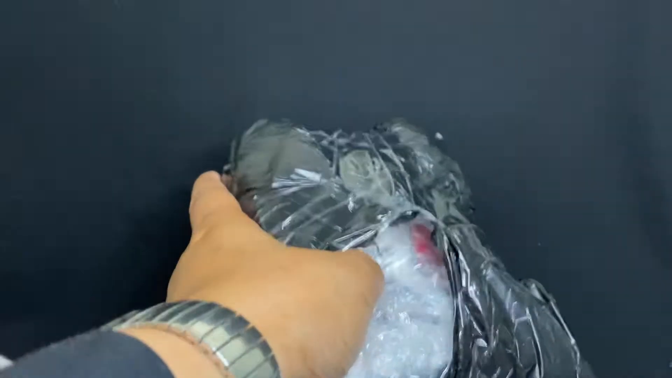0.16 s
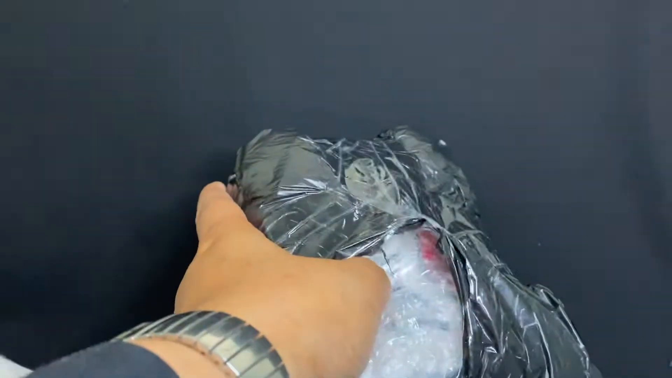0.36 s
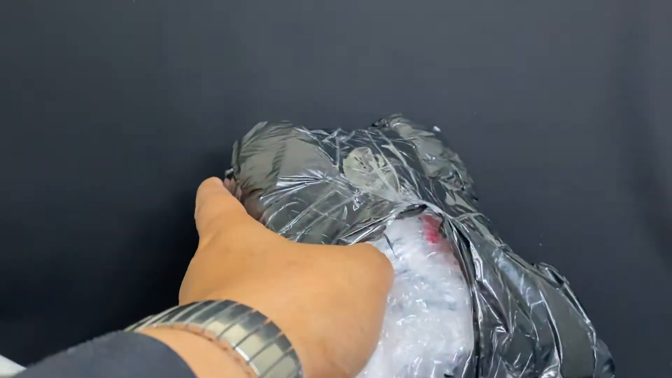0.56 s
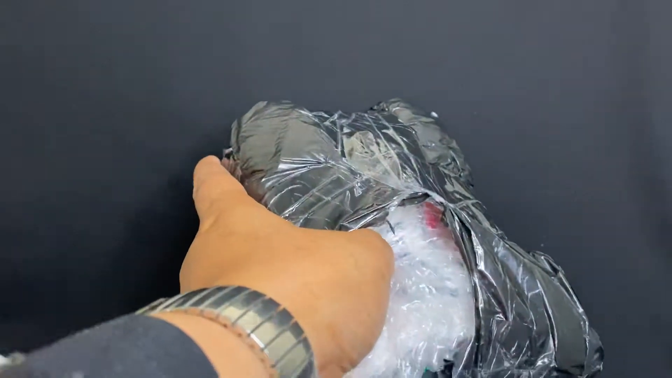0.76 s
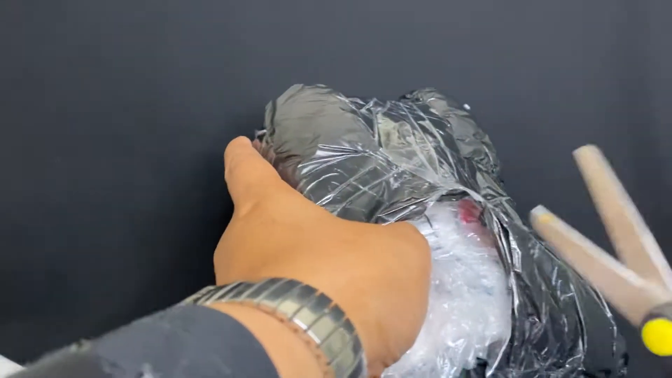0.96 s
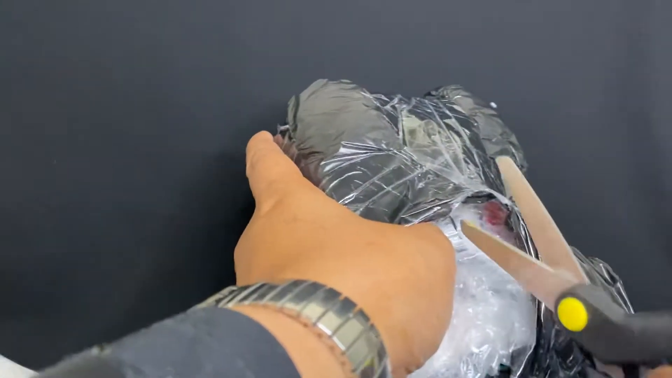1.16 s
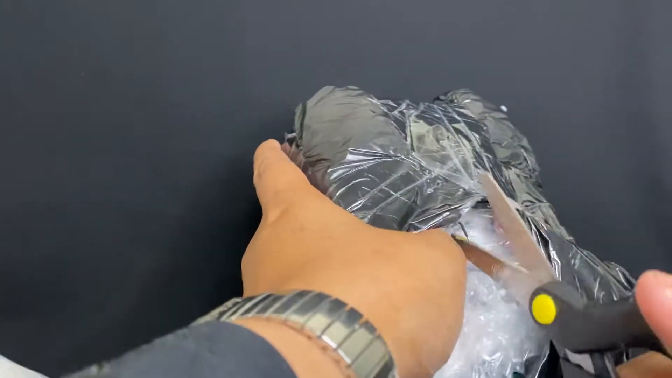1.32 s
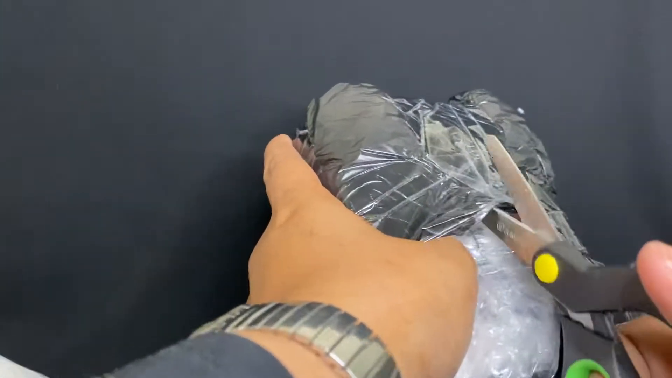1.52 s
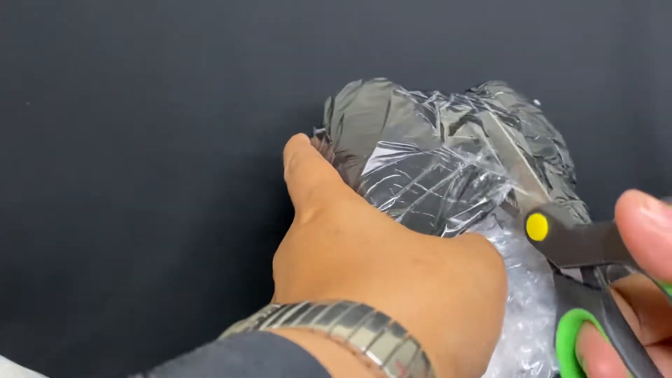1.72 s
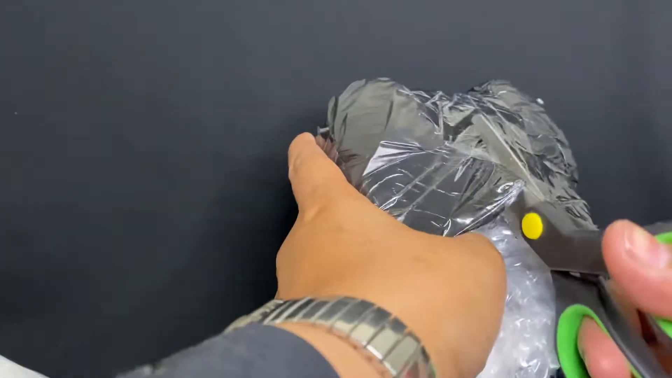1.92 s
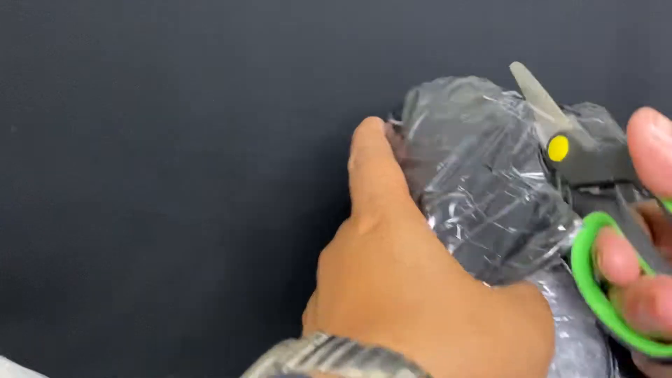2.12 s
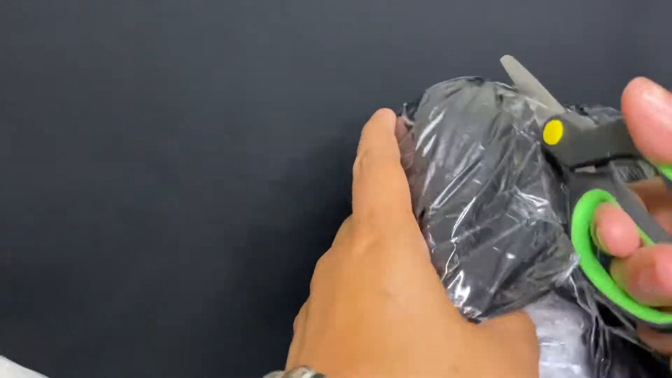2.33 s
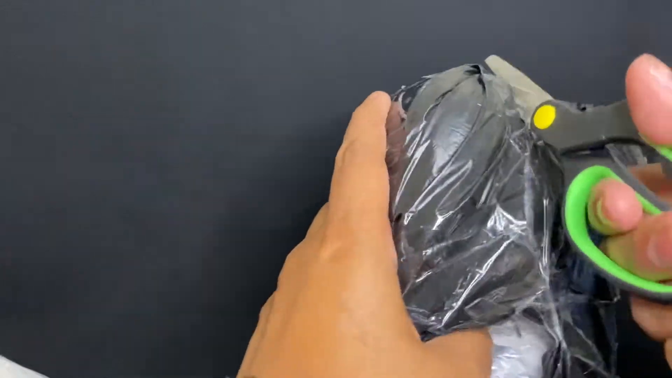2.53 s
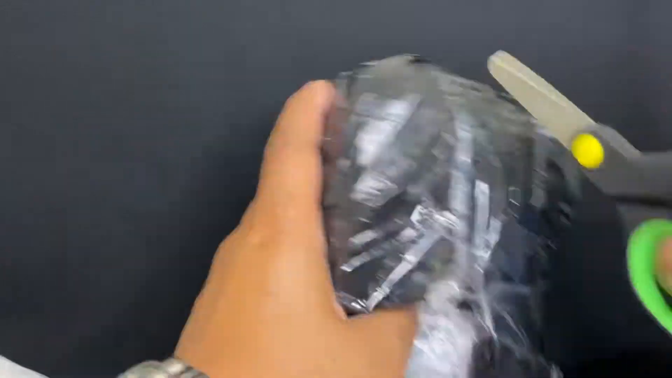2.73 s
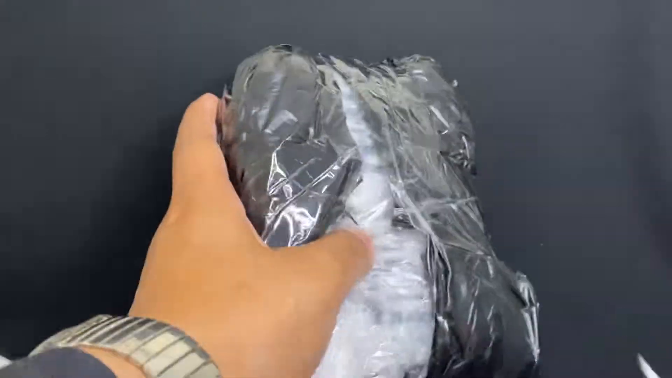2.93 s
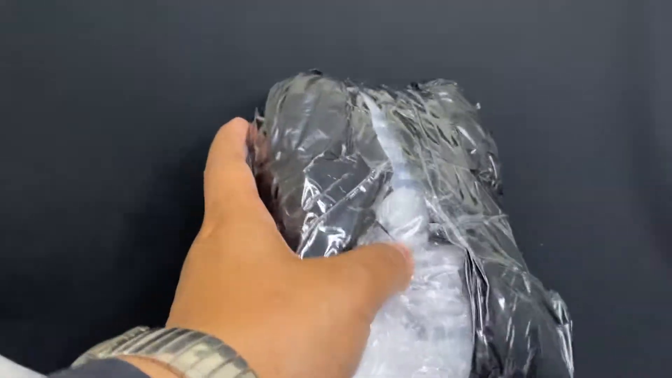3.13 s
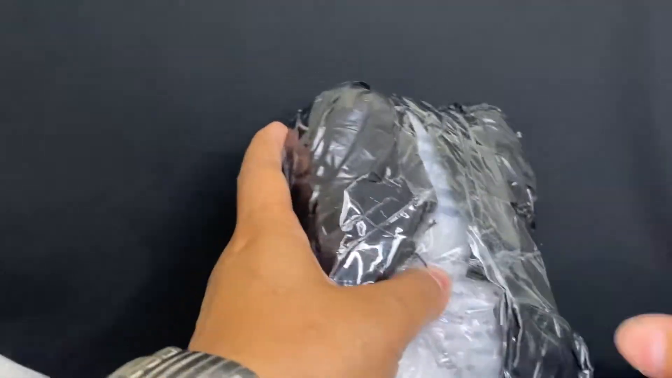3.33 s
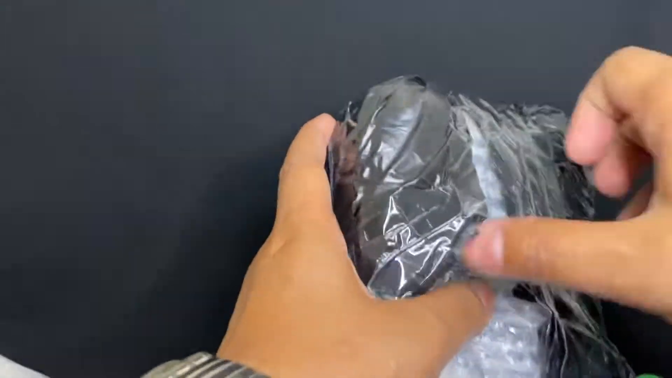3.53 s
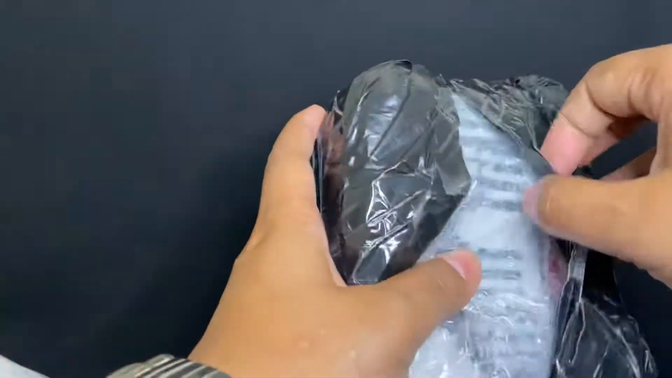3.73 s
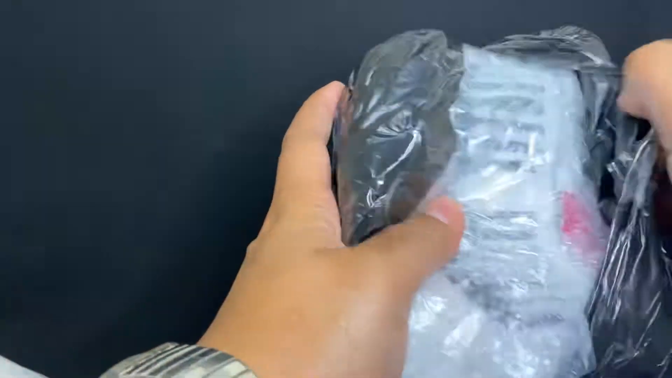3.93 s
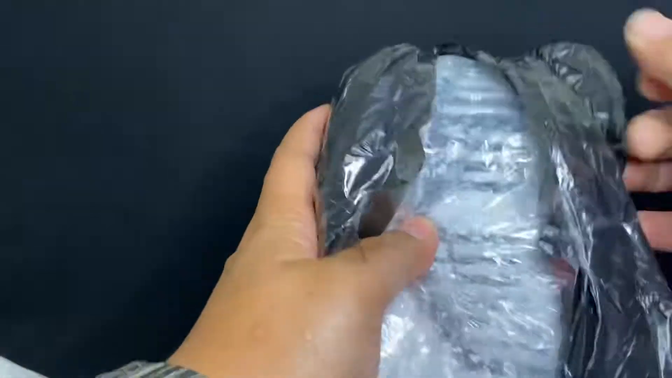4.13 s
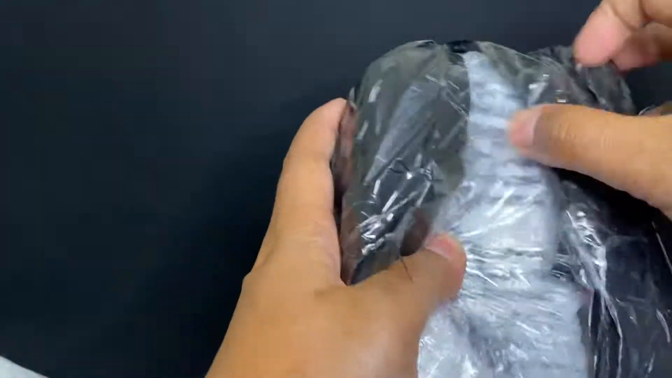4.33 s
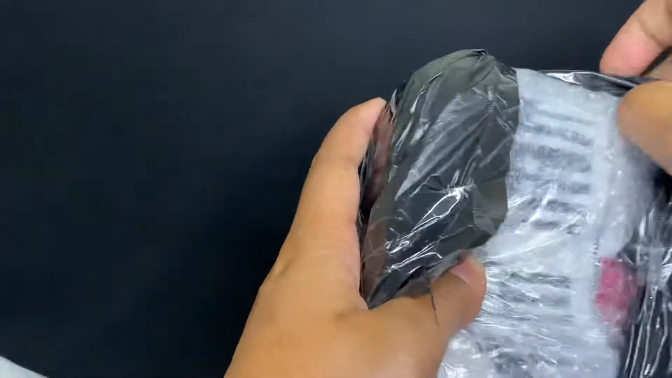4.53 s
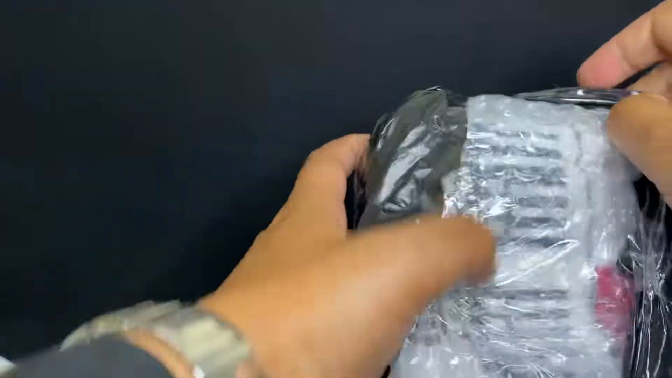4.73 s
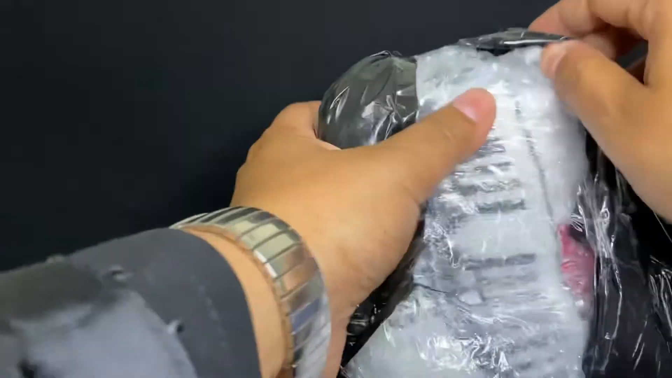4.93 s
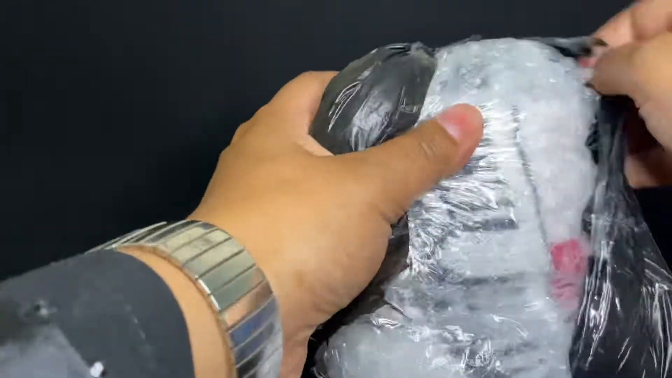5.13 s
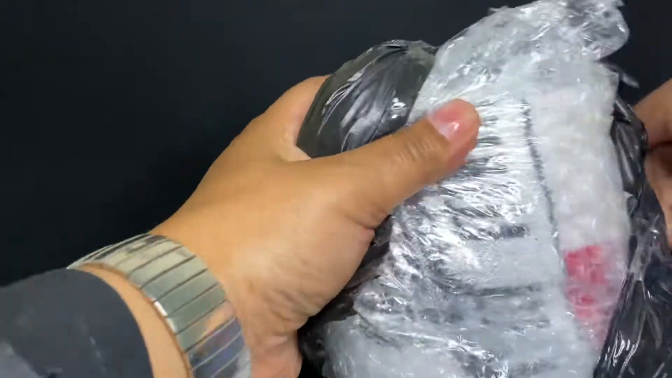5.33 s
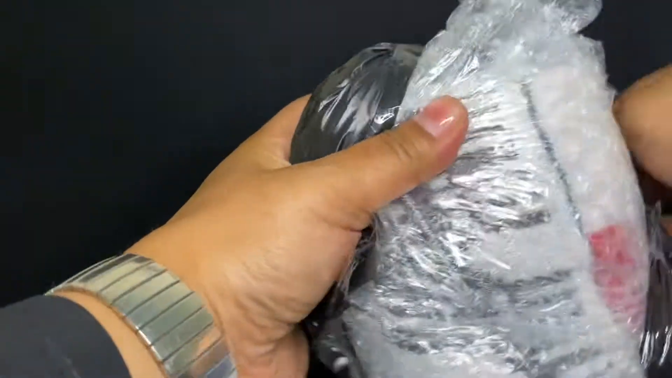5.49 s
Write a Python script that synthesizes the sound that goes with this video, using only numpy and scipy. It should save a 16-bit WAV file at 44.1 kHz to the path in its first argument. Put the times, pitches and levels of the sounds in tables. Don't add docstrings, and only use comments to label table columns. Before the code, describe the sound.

A close, dry stereo phone pickup in a quiet room with a faint low hum. At about 0.1 s a soft, deep table thump marks the grip shifting, with lighter bumps near 0.2 and 0.4 s; until 1.4 s there are only faint film rustles and tiny flicks. From 1.45 s scissors work into the plastic, and from about 1.75 to 2.15 s they bite with dense crunchy rustling, hollow mid-pitched snaps and fine ticks. Smaller snips and creases continue, thinning out by 2.85 s. Around 3.05 s the parcel drops with a low thud, and from 3.44 to 3.6 s the scissors clatter down in a cluster of strong, booming tabletop knocks. From 3.6 s fingers pull the film, swelling to bright crackles and hard snaps around 3.9-4.1 s, a very sharp pop at 4.4 and 4.56 s, another burst near 5.15 s, and continued peeling crackle to the end at about 5.7 s.

```python
import sys
import numpy as np
from scipy import signal
from scipy.fft import rfft, irfft
from scipy.io import wavfile
from scipy.ndimage import uniform_filter1d

SR = 44100
rng = np.random.default_rng(int(sys.argv[2]) if len(sys.argv) > 2 else 0)


def dump(signal):
    limited = np.clip(np.atleast_2d(signal).T, -1, 1)
    pcm = np.round(limited * 32767).astype(np.int16)
    wavfile.write(sys.argv[1], SR, pcm)


def invert_db(level):
    return 10 ** (np.asarray(level, dtype=float) / 20)


N = 249606
SECONDS = np.arange(N) / SR
TRAVEL_S = 0.007
FIRST_S = 0.00139


def evened(x):
    return x / np.sqrt(np.mean(x ** 2) + 1e-20)


def read(points, hz):
    f, value = np.transpose(points)
    return np.interp(np.log(hz + 1), np.log(f + 1), value)


def follow(points):
    return np.interp(SECONDS, *np.transpose(points))


def add(mix, s, sound):
    part = mix[..., round(s * SR):][..., :sound.shape[-1]]
    part += sound[..., :part.shape[-1]]


def coloured(x, points):
    return irfft(rfft(x) * invert_db(read(points, np.fft.rfftfreq(len(x), 1 / SR))), len(x))


def band(x, lo_hz, hi_hz):
    return signal.sosfilt(signal.butter(2, [lo_hz, hi_hz], "band", fs=SR, output="sos"), x)


def noise_band(count, lo_hz, hi_hz):
    return evened(band(rng.standard_normal(count), lo_hz, hi_hz))


# [peak t/s, level/dB, rise t/s, fall t/s]
CUT_GESTURES = [(0.039, -53, 0.08, 0.17), (.184, -56.5, 0.1, 0.42), (0.374, -58.5, 0.23, 0.22),
                (.489, -54.5, 0.07, 0.41), (0.775, -57.5, 0.071, 0.51), (.878, -67, 0.033, 0.25),
                (1.011, -55.5, 0.02, 0.02), (1.195, -60.5, 0.053, 0.15), (1.312, -55, 0.0083, 0.094),
                (1.362, -56, 0.032, 0.032), (1.453, -50, 0.0039, 1), (1.52, -49, 0.04, 0.15),
                (1.595, -39.5, 0.087, 0.092), (1.682, -46, 0.0058, 0.13), (1.797, -33, 0.04, 0.038),
                (2.002, -32, 0.032, 0.12), (2.05, -33, 0.035, 0.095), (2.11, -29.5, 0.11, 0.061),
                (2.241, -40.5, 0.039, 0.14), (2.308, -35, 0.049, 0.06), (2.447, -41.5, 0.17, 0.14),
                (2.574, -43, 0.072, 0.021), (2.699, -36, 0.086, 0.039), (2.824, -48, 0.25, 0.51)]
# [peak t/s, level/dB, rise t/s, fall t/s]
PULL_GESTURES = [(3.077, -61.5, 0.12, 0.62), (3.19, -54.5, 0.07, 0.093), (3.31, -57.5, 0.52, 0.1),
                 (3.445, -52, 0.023, 0.056), (3.566, -36.5, 0.033, 0.99), (3.851, -33, 0.012, 0.062),
                 (3.94, -28.5, 0.16, 0.093), (3.989, -30, 0.073, 0.029), (4.411, -34.5, 0.02, 0.093),
                 (4.624, -28, .01, 0.012), (5.199, -24.5, 0.053, 0.014), (4.037, -23, 0.0062, 0.031),
                 (4.079, -29.5, 0.026, 0.039), (4.16, -38, 0.085, 0.43), (4.362, -31.5, 0.2, 0.32),
                 (4.58, -33.5, 0.54, 0.27), (4.848, -35, 0.041, 1), (5.144, -28.5, 0.39, 0.22),
                 (5.4, -36.5, 0.65, 0.37), (5.504, -31.5, 0.55, 0.016), (5.66, -33, 0.18, .2)]


def effort():
    swing_db, rest_db = 20, -86
    t = np.arange(0, N + 64, 64) / SR
    s, db, rise, fall = np.transpose(CUT_GESTURES + PULL_GESTURES)[..., None]
    before = (s - t) / np.maximum(rise, 0.002)
    after = (t - s) / np.maximum(fall, 0.002)
    away = np.where(t < s, before, after)
    power = invert_db(2 * (db - swing_db * away)).sum(0) + invert_db(2 * rest_db)
    return np.interp(SECONDS, t, 10 * np.log10(power))


def buckles(per_s=2500, spread_db=7.5):
    size = invert_db(spread_db * np.minimum(rng.exponential(1, N), 3.0))
    size *= rng.random(N) < per_s / SR
    size *= rng.choice([-1., 1.], N)
    kind = rng.integers(0, 24, N)
    t = np.arange(200) / SR
    out = np.zeros(N)
    for k, hz in enumerate(np.geomspace(600, 15000, num=24)):
        grain = np.sin(2 * np.pi * hz * t) * np.exp(-t * hz / 1.3)
        out += signal.oaconvolve(size * (kind == k), evened(grain) * np.sqrt(hz))[:N]
    return evened(out)


# [f/Hz, level/dB]
FILM_TONE = [(150, 4.5), (400, 1), (900, 1), (1700, -0.5), (3000, -5), (6000, -8), (10000, -5.5),
             (15500, -9)]
# [t/s, level/dB]
FOLD_SIZE = [(0, -10.5), (.3, -1), (1.0, -13), (1.4, -2), (1.8, -3.5), (2.048, 4.5), (2.6, -2.5),
             (2.78, -10.5), (3.038, -7.5), (3.35, -4), (3.5, 0), (3.6, -6.5), (4.55, -5.5), (4.9, -6),
             (5.15, -8.5), (5.66, -3.5)]
# [t/s, level/dB]
HOLLOW = [(1.4, -34), (1.46, -6), (1.57, 11.5), (1.7, -18), (1.95, -19), (2.0, -26), (2.07, -20),
          (2.12, -11), (2.2, -19), (2.3, -15), (2.75, -12), (3.0, -39)]


def rustle(clump_db=1.89, wash_db=3.0):
    clumps = evened(uniform_filter1d(uniform_filter1d(rng.standard_normal(N), 250), 250))
    level_db = effort()
    blur_db = wash_db + 0.32 * (level_db + 41.5)
    swarm = buckles() + invert_db(blur_db) * rng.standard_normal(N)
    swarm *= invert_db(clump_db * clumps) / np.sqrt(1 + invert_db(2 * blur_db))
    film = coloured(swarm, FILM_TONE)
    film /= np.std(band(film, 2500, 7000))
    low = signal.sosfiltfilt(signal.butter(1, 2000, fs=SR, output="sos"), film)
    body_db = follow(FOLD_SIZE) - 0.1859 * (level_db + 61.5)
    low_gain = invert_db(body_db) / np.std(band(low, 500, 2000))
    hollow = invert_db(follow(HOLLOW)) * band(low, 1250, 1990)
    return invert_db(level_db - 3.5) * (film - low + low_gain * (low + hollow))


def creased(creases, blunt=0):
    out = np.zeros(N)
    t = np.arange(1500) / SR
    ms = 1000 * t
    give = 1 - np.exp(-ms / 0.5)
    for k, (s, db, hz, sharp_db) in enumerate(creases):
        cycles = 1.3 if 1.4 < s < 2.35 else 0.55
        u = t * hz / cycles
        ring = np.sin(2 * np.pi * hz * t) * u * np.exp(1 - u)
        crack = invert_db(sharp_db + 6.0) * noise_band(1500, 1500, 5000) * np.exp(-ms / 0.9)
        dull_db = -10 if k < blunt else 0
        edge = invert_db(1.1 * sharp_db + 6.5 + dull_db) * noise_band(1500, 3500, 16400) * np.exp(-ms / 0.8)
        shiver = invert_db(-20) * noise_band(1500, 0.16 * hz, min(2.2 * hz, 15000)) * np.exp(-ms / 3.6)
        add(out, s, invert_db(db - 13.0) * (ring + (crack + edge + shiver) * give))
    return out


# [t/s, peak level/dB, ring f/Hz, sharpness level/dB]
NICKS = [(.026, -24.5, 1970, -1.5), (.499, -16, 2770, -4), (1.018, -25, 2360, -0.5), (1.45, -30, 1570, -8),
         (1.763, -15, 1730, -5.5), (1.7834, -5.5, 3100, -22), (1.785, -1.5, 1700, -9.5),
         (1.7955, -11.5, 764, -25), (1.797, -7, 1590, -15), (1.974, -21, 1620, -26), (1.993, -4, 1860, -30),
         (2.002, -5.5, 1570, -30), (2.0125, -4, 1760, -28), (2.025, -5, 1650, -26), (2.043, -13.5, 1030, 0),
         (2.074, -13.5, 750, -10), (2.131, -10, 1690, -3.5), (2.291, -13, 1590, -12),
         (2.305, -14, 1590, -23), (2.359, -24, 1840, 2), (2.38, -26.5, 1690, 4.5), (2.419, -10, 1840, -11),
         (2.437, -10.5, 930, 0.5), (2.483, -18, 700, -3.5), (2.565, -6.5, 1820, -6.5),
         (2.597, -15.5, 1960, -0.5), (2.659, -19.5, 2630, -0.5), (2.683, -19, 1250, -21),
         (2.694, -18.5, 810, -18), (2.833, -15.5, 1470, 0), (2.847, -17.5, 1370, -5),
         (2.979, -18.5, 1250, -3)]
# [t/s, peak level/dB, ring f/Hz, sharpness level/dB]
TUGS = [(3.035, -20, 1100, -30), (3.434, -29, 920, -26), (3.282, -22.5, 1010, -3.5),
        (3.313, -18, 6900, -17), (3.415, -30, 5300, -7), (3.4755, -8, 4440, -22), (3.667, -16, 1650, -2),
        (3.705, -10, 3150, -8), (3.734, -9, 3120, -11), (3.769, -14.5, 1350, -6), (3.818, -14, 1380, -3),
        (3.845, -19, 800, 7), (3.9, -8.5, 1190, -10), (3.926, -2.5, 940, -4.5), (3.986, -5.5, 4700, -6),
        (4.006, -5, 1280, -10), (4.033, -8.5, 726, -7), (4.081, -2.5, 3080, -24), (4.151, -20, 1660, -8),
        (4.24, -10.5, 1220, -2), (4.336, -5.5, 2450, -1.5), (4.367, -4.5, 1640, 0), (4.407, 4.5, 6470, -20),
        (4.408, -7, 1310, -15)]
# [t/s, peak level/dB, ring f/Hz, sharpness level/dB]
PEELS = [(4.496, -18, 4100, -12), (4.558, 6, 1330, -11.5), (4.621, -13, 750, -9), (4.772, -18.5, 1130, -34),
         (4.844, -9, 1210, -21), (4.988, -11.5, 7300, 0), (5.0985, -3, 1090, -2.5), (5.107, -1, 2320, -5),
         (5.149, -1.5, 930, 1.5), (5.154, -2, 1660, 1.5), (5.182, 2, 4800, -8), (5.186, -6, 1540, -10),
         (5.449, -12.5, 1000, -20), (5.493, -12.5, 968, -5), (5.519, -10.5, 1100, -7),
         (5.599, -13.5, 1040, 1.5), (5.629, -5.5, 1120, -12)]
# [t/s, peak level/dB, ring f/Hz, sharpness level/dB]
FLICKS = [(0.0574, -26.5, 2080, -14), (0.1928, -26, 6520, -15), (0.305, -43, 3120, 3),
          (0.393, -43, 4400, 5.5), (0.447, -36, 3260, 1.5), (0.4763, -44, 10700, -5),
          (0.482, -41, 2770, -17), (0.5384, -18, 11500, -28), (0.608, -29, 11900, -9),
          (0.7342, -40, 2580, 2), (0.839, -33.5, 2370, -12), (0.876, -29, 7530, -15),
          (1.0047, -32, 7210, -12), (1.0087, -42, 2500, 5), (1.125, -38, 5900, -18), (1.257, -42, 1880, -5),
          (1.3172, -27.5, 6920, -24), (1.3614, -39, 10500, -5), (1.4638, -21, 10800, -25),
          (3.0034, -34, 2670, -8), (3.115, -42, 2440, -12), (3.1607, -29, 11200, -14),
          (3.1873, -16, 11300, -19), (3.2, -47, 3180, -4), (3.2306, -50, 2850, -8),
          (3.266, -22, 11600, -22), (3.345, -37, 6750, -4)]
# [t/s, peak level/dB, ring f/Hz, sharpness level/dB]
BITES = [(1.758, -22.5, 1720, -31), (1.8074, -35, 1360, -27), (1.8412, -32, 1640, -25),
         (1.9639, -35, 1500, -25), (1.9683, -32, 1630, -45.5), (1.982, -23, 1846, -25),
         (2.034, -19, 1570, -25), (2.048, -15, 1910, -25), (2.0588, -31, 1850, -25),
         (2.0824, -24, 2180, -25), (2.093, -25, 2020, -23), (2.0994, -36, 1620, -25),
         (2.108, -30, 1610, -25), (2.117, -31, 1660, -25), (2.124, -26, 1660, -25), (2.138, -35, 1640, -25)]
# [t/s, peak level/dB, ring f/Hz, sharpness level/dB]
PUCKERS = [(2.1954, -40, 1920, 5), (2.223, -32, 1580, -8), (2.2398, -22.5, 1690, -20),
           (2.367, -24, 2420, -5), (2.535, -34, 1490, -14), (2.5772, -24, 900, 2), (2.626, -29, 3120, 1),
           (2.6504, -31, 1420, 2.5), (2.743, -34, 7620, -9), (2.766, -37, 1740, -8),
           (2.885, -45, 2460, -12), (2.9402, -32, 1690, -13), (2.959, -33, 1400, -3),
           (3.7584, -24.5, 1240, 1.5), (3.8807, -20, 1028, 1), (3.9105, -17, 1210, 2),
           (4.1625, -16.5, 2130, -4.5), (4.3234, -27, 2200, -15), (4.894, -27, 6700, -10),
           (5.215, -14, 2480, -16), (5.341, -30, 1750, -16), (5.564, -24, 990, 2)]


def snaps():
    dents = [(s + FIRST_S, db + mid_db + 2, 772, -59 + 0.58 * top_db)
             for s, db, mid_db, top_db, _ in BLOWS]
    small = [(s, db + 4, hz, sharp_db) for s, db, hz, sharp_db in FLICKS + BITES + PUCKERS]
    return creased(dents + NICKS + TUGS + PEELS + small, blunt=len(dents))


# [t/s, peak level/dB]
TICKS = [(0.177, -39), (0.2326, -38), (0.63, -39.5), (1.4504, -40), (1.7843, -38), (1.797, -24),
         (1.993, -35), (2.018, -25), (2.0468, -22), (2.0475, -19), (2.417, -30), (2.5651, -25),
         (2.595, -27.5), (3.058, -37), (3.162, -39), (3.3129, -36), (3.476, -29), (3.5508, -32),
         (3.847, -28), (3.9273, -19), (4.035, -21), (4.081, -19.5), (4.3345, -61.5), (4.3363, -21),
         (4.4947, -27), (4.555, -21), (5.012, -22.5), (5.1482, -40), (5.4217, -18.5), (5.5694, -27)]


def ticks():
    out = np.zeros(N)
    ms = 1000 * np.arange(1500) / SR
    shape = np.exp(-ms / 1.4) * (1 - np.exp(-ms / 0.5))
    for s, db in TICKS:
        add(out, s, invert_db(db + 5.5) * noise_band(1500, 7700, 17000) * shape)
    return out


# [t/s, peak level/dB, ring f/Hz, sharpness
# level/dB]
MORE_CREASES = [(2.011, -16, 1720, -30), (2.074, -15, 2100, -12), (2.362, -22, 4500, -5),
                (2.687, -17, 1100, -17), (3.0385, -21, 1080, -27), (3.044, -10, 3570, -31),
                (3.1425, -9.5, 1250, -35), (3.4415, -7, 2540, -26), (3.4965, -15, 1490, -21),
                (3.5005, -4, 1090, -25), (3.5155, -8, 1800, -28), (3.903, -10, 1220, -10), (3.937, -21, 790, 1),
                (3.943, -9, 1200, -4), (3.98, -6.5, 990, -12), (4.396, -19, 2200, 2), (4.571, -10.5, 810, -0.5),
                (4.625, -16, 890, -1), (5.015, -5, 6500, -11), (5.174, -12, 2100, -18), (5.31, -13, 2200, -11),
                (5.32, -17, 900, -15), (5.392, -17, 2300, -8), (5.422, -15.5, 1090, 2), (5.52, -5.5, 3700, -15),
                (5.629, -2, 5500, -14), (1.4975, -20, 11000, -13), (3.162, -26, 4200, -20),
                (3.485, -14, 3000, -16), (0.4365, -18, 700, -22), (5.654, -14, 2010, -2)]


def more_creases():
    return creased(MORE_CREASES)


def sweep():
    hz = np.fft.rfftfreq(2048, 1 / SR)
    delayed = irfft(np.exp(-4j * np.pi * TRAVEL_S * np.sqrt(200 * hz)))
    pulse = band(delayed, 526, 3820)[:800]
    return pulse / abs(pulse).max()


# [t/s, boom level/dB, knock level/dB above boom, tick level/dB above boom,
# ring length as a factor]
BLOWS = [(0.095, -14, -14, -34, 1.18), (0.106, -24, -13, -8, 1), (0.22, -30.5, -19, -27, 1),
         (0.435, -28, -1, -12, 1.55), (1.785, -26.5, 10, 21.5, 0.65), (2.043, -25, 2, -4, 0.77),
         (2.089, -27, -5, -8, 1.2), (2.435, -24.5, -2.5, 28.5, 0.54), (2.574, -30.5, 1.5, -3, 0.76),
         (2.681, -33.5, -4, -4, 0.84), (3.042, -10, 1, 16.5, 1.01), (3.143, -14, -0.5, -5, 0.99),
         (3.441, -4, -7.5, 10, 0.99), (3.4744, -11, 10.5, 27, 0.61), (3.496, -7.5, -21, 12.5, 0.87),
         (3.515, -11.5, 1.5, 12, 0.79), (3.558, -20.5, -0.5, 9, 0.99), (3.601, -32.5, -5, 10, 1.6),
         (3.453, -20.5, -19, 16, 1.6), (3.484, -29, 0, 2, 0.56), (3.527, -21.5, -4, 12, 0.97),
         (3.925, -21, -1.5, 18, 1.54), (4.034, -8, -9, 9.5, 0.76), (4.079, -21, -8, 8, 0.88),
         (4.557, -25.5, 5.5, 20.5, 1.28), (5.148, -20.5, 6, 21, 0.94), (5.627, -28, 3.5, 3, 0.93)]
# [f/Hz, level/dB, fall by 60 dB t/s, extra level/dB under dropped scissors]
TABLE_TOP = [(58.8, -16, 0.67, 0.5), (93, 1.5, 0.1, -1), (144, 2.5, 0.099, -0.5), (221.9, -2.5, 0.13, -4.5),
             (351.3, -6.5, 0.053, 8), (411, 2.5, 0.057, 0), (464, -10.5, 0.062, 10.5), (601, -13, 0.1, -4),
             (684, -6.5, 0.073, -24), (776, -4, 0.075, -11), (887, -3, 0.086, 4), (1247, 2, 0.023, -3),
             (2296, -11, 0.023, 1), (2720, 0.5, 0.013, -7)]
# [f/Hz, level/dB, fall by 60 dB t/s, extra level/dB under dropped scissors]
SHELL = [(1385, -21, 0.064, -1), (1476, -21, 0.07, 7.5), (1650, -25, 0.064, 5), (1795, -15, 0.035, 6),
         (2120, -20, 0.043, -11), (2360, -34, 0.06, -4), (2450, -29, 0.05, 12), (2540, -21, 0.069, -1),
         (3700, -20, 0.02, -1)]


def knocks(boom_db=-1.5, knock_db=-8.0, tick_db=-16.5, rise=0.91):
    out = np.zeros(N)
    t = np.arange(SR // 2) / SR
    hz, db, t60, drop_db = np.transpose(TABLE_TOP + SHELL)[..., None]
    late = TRAVEL_S * np.sqrt(200 / hz)
    swell = 1 - np.exp(-(t / (rise * late)) ** 3)
    for s, blow_db, mid_db, top_db, free in BLOWS:
        tune, turn, place = rng.random((3, len(hz), 1))
        upper_db = np.where(hz < 1100, knock_db + mid_db, tick_db + top_db)
        share_db = np.where(hz < 370, boom_db, upper_db)
        spot_db = 0.84 * (place - 0.5) + drop_db * (3.4 < s < 3.62)
        ring = np.sin(2 * np.pi * (hz * (0.993 + 0.014 * tune) * (t - 2 * late) + 0.12 * turn))
        ring_db = blow_db + share_db + spot_db + db - 60 * t / (free * t60)
        add(out, s, (invert_db(ring_db) * swell * ring).sum(0))
        add(out, s, invert_db(blow_db + 1.8 * mid_db + 0.36 * top_db - 31.0) * sweep())
        rattle = invert_db(blow_db + top_db - 34.0 - 60 * t / 0.014) * noise_band(len(t), 940, 1600)
        rattle += invert_db(blow_db + mid_db - 14.0 - 60 * t / 0.11) * noise_band(len(t), 384, 863)
        rattle += invert_db(blow_db + 0.78 * top_db - 41.5 - 60 * t / 0.12) * noise_band(len(t), 1600, 3500)
        add(out, s + FIRST_S, rattle * (1 - np.exp(-t / 0.00022)))
    return out


# [f/Hz, level/dB]
RUMBLE_TONE = [(20, -26), (42, -4.5), (70, -2.5), (120, -10.5), (189, -16.5), (301, -28), (900, -43),
               (1300, -82)]
# [t/s, level/dB]
SHIFTS = [
    (.17, -41),
    (.68, -51),
    (2.1, -68),
    (3.09, -41),
    (3.601, -45),
    (3.9, -63),
    (4.4, -47),
    (4.81, -48.5),
    (5.66, -36.5),
]


def rumble(hum_db=-54, shift_s=0.048):
    low = coloured(rng.standard_normal(N), RUMBLE_TONE)
    s, db = np.transpose(SHIFTS)[..., None]
    weight = invert_db(hum_db) + (invert_db(db) * np.exp(-abs(SECONDS - s) / shift_s)).sum(0)
    return weight * low / np.std(band(low, 61.4, 234))


# [f/Hz, fall by 60 dB t/s]
ROOM_DECAY = [(100, 0.42), (1000, 0.16), (4000, 0.14), (16000, 0.14)]


def room(x):
    taps = np.zeros((2, SR // 2))
    at = np.arange(100, SR // 2 - 20, 20) + rng.integers(0, 20, (2, (SR // 2 - 101) // 20))
    np.put_along_axis(taps, at, rng.choice([-1., 1.], at.shape), 1)
    hz, t, z = signal.stft(taps, SR, nperseg=128)
    fade = invert_db(-60 * t / read(ROOM_DECAY, hz)[:, None])
    tail = signal.istft(z * fade, SR, nperseg=128)[1]
    echo = signal.fftconvolve(x[None], tail / np.linalg.norm(tail[0]), axes=1)[:, :N]
    wide = band(echo[0] - echo[1], 350, 16000)
    return echo.mean(0) + np.outer([0.5, -0.5], wide)


# [f/Hz, level/dB]
HUSH_TONE = [(200, 9), (1000, 3), (1600, -9), (16000, -11)]


def hush():
    return invert_db(-85) * evened(coloured(rng.standard_normal(N), HUSH_TONE))


def scene():
    hits = snaps() + ticks() + knocks()
    near = hits + rustle() + more_creases() + rumble() + hush()
    sides = invert_db(np.array([[0.4], [-0.4]]))
    return near * sides + invert_db(-11.0) * room(hits)


# [f/Hz, phase/radians]
PORT_LEAD = [(0, 0), (6900, 0), (17400, -5 * np.pi)]
# [f/Hz, likeness 0-1]
PORT_LIKENESS = [(100, .9995), (200, .99), (350, .87), (700, .72), (1500, .7), (5500, .7), (6700, .84),
                 (16000, .84)]


def two_ports(dry):
    hz, t, (left, right) = signal.stft(dry, SR, nperseg=512, noverlap=384)
    same = np.clip(read(PORT_LIKENESS, hz), 0, 1)[:, None]
    folds = rng.standard_normal((2, len(t), len(hz)))
    folds = evened(uniform_filter1d(uniform_filter1d(folds, size=8, axis=1), size=6, axis=2))
    unlike = (0.96 * folds[0] + 1.15j * folds[1]).T * np.sqrt((1 - same) / (1 + same) / 2)
    turn = np.exp(0.5j * np.interp(hz, *np.transpose(PORT_LEAD)))[:, None]
    pair = np.array([left * (1 + unlike) * turn, right * (1 - unlike) / turn])
    return signal.istft(pair, SR, nperseg=512, noverlap=384)[1][:, :N]


def range_limits(ports):
    ports = signal.sosfilt(signal.butter(4, 42, "high", fs=SR, output="sos"), ports)
    low_pass = signal.firwin(255, 16800, window=("kaiser", 5), fs=SR)
    ports = signal.oaconvolve(ports, low_pass[None], "same")
    bent = np.sign(ports) * (0.6 + 0.3 * np.tanh((abs(ports) - 0.6) / 0.3))
    return np.where(abs(ports) < 0.6, ports, bent)


# [f/Hz, level/dB]
WEAK = [(1400, -10), (5800, -9), (6400, -4.2), (16000, -4.2)]


def joint(ports, from_hz=1400, crest=9.0):
    pair = np.array([ports[0] + ports[1], ports[0] - ports[1]]) / 2
    hz, t, z = signal.stft(pair, SR, nperseg=1024, noverlap=768)
    rows, cols = np.arange(len(hz)) // 10, np.arange(len(t)) // 4
    power = np.add.reduceat(abs(z) ** 2, np.arange(0, len(hz), 10), axis=1)
    power = np.add.reduceat(power, np.arange(0, len(t), 4), axis=2)
    power = uniform_filter1d(power, 3, axis=2)
    edge = np.resize(np.diff(ports[0]), (power.shape[2], 1024))
    peak, usual = abs(edge).max(1), edge.std(1)
    steady = peak < np.where(usual < 0.003, 0.74, 1) * crest * usual
    limit = invert_db(2 * read(WEAK, hz[::10]))[:, None]
    weak = (power < limit * power[::-1]) & steady
    z = z * ~(weak[:, rows][:, :, cols] & (hz > from_hz)[:, None])
    dull = peak < 1.27 * crest * usual
    z = z * ~((hz > 15800)[:, None] & dull[cols])
    total, differ = signal.istft(z, SR, nperseg=1024, noverlap=768)[1][:, :N]
    return np.array([total + differ, total - differ])


def top_cut(x):
    return signal.sosfilt(signal.butter(12, 16980, fs=SR, output="sos"), x)


def record(dry):
    mix = joint(range_limits(two_ports(dry)))
    return top_cut(mix)


dry = scene()
out = record(dry)
dump(out)
```